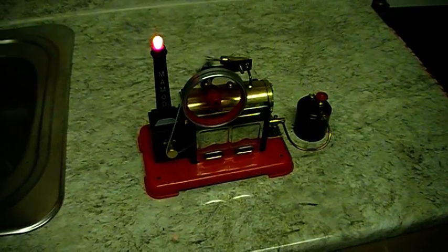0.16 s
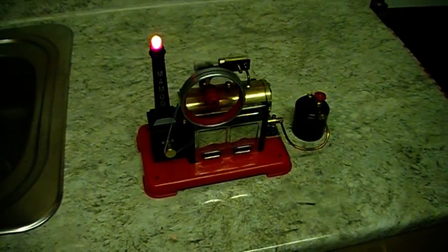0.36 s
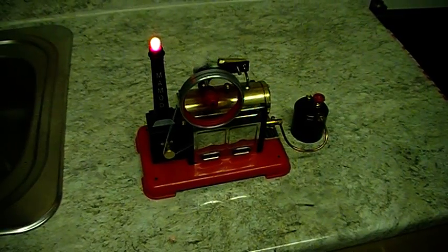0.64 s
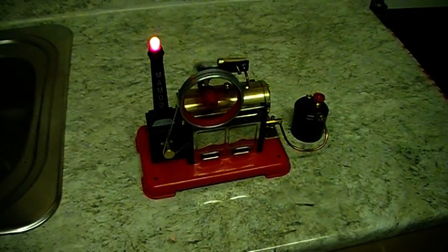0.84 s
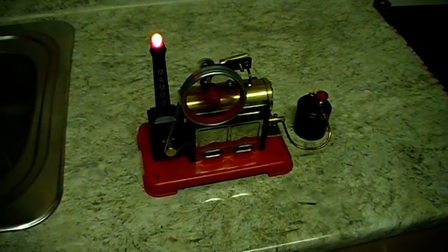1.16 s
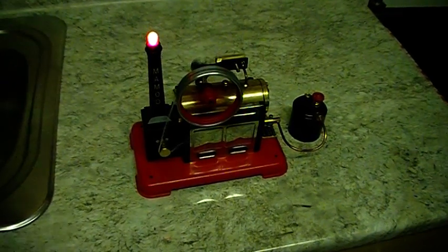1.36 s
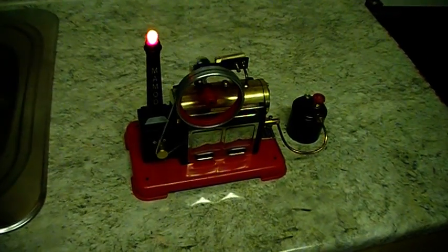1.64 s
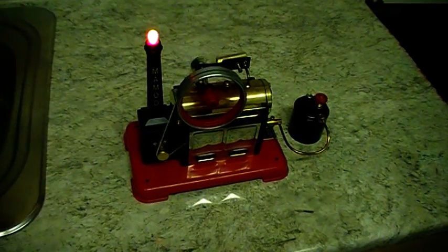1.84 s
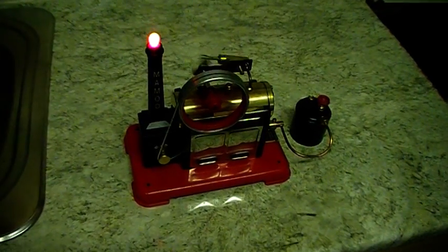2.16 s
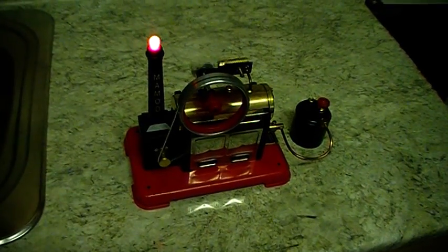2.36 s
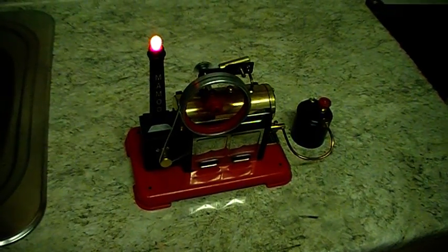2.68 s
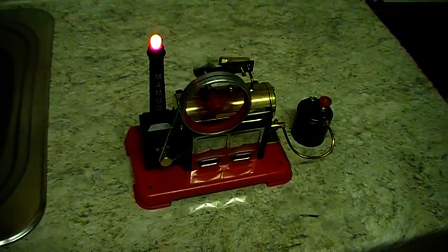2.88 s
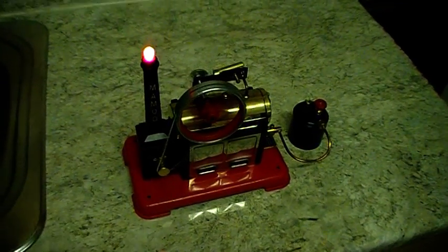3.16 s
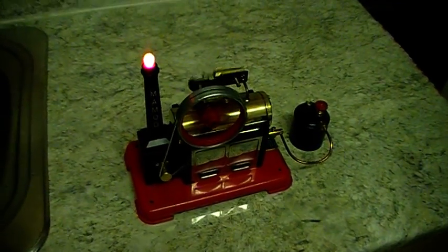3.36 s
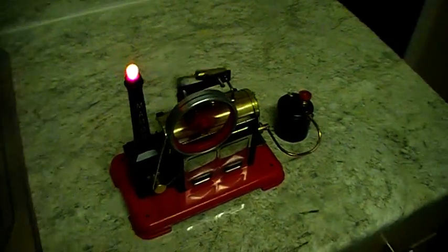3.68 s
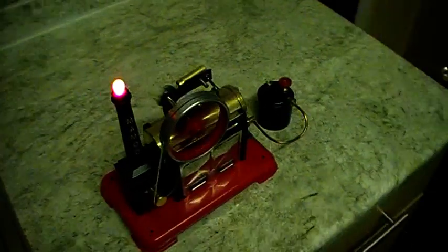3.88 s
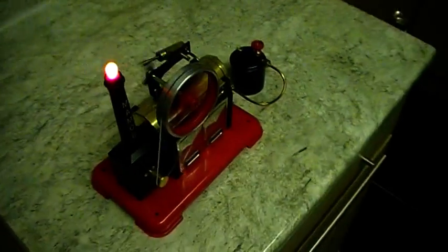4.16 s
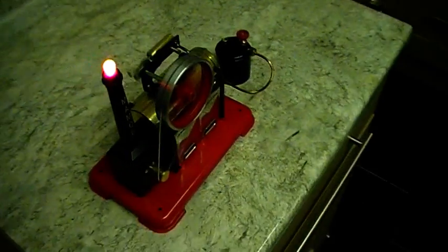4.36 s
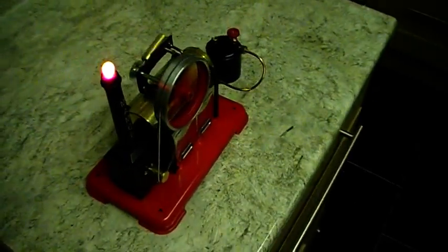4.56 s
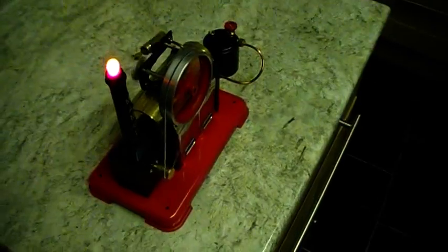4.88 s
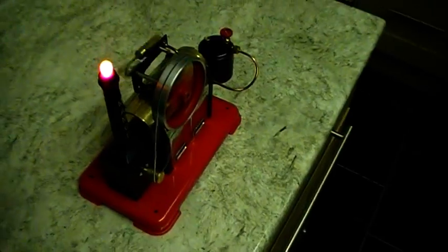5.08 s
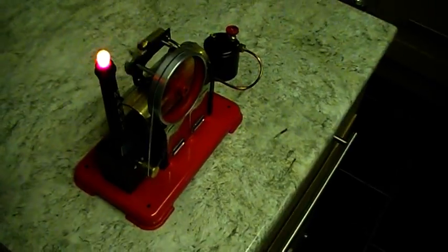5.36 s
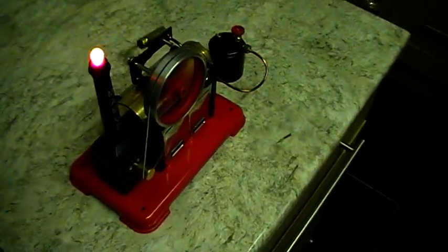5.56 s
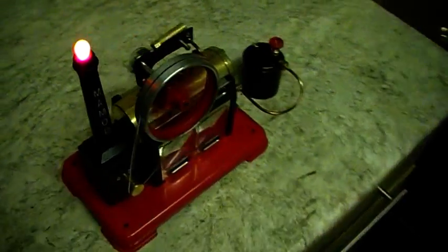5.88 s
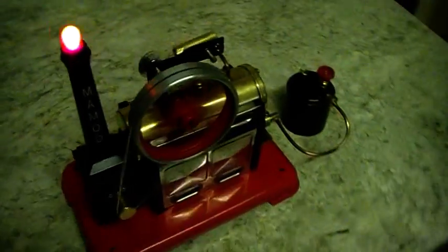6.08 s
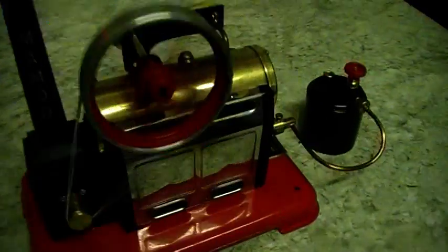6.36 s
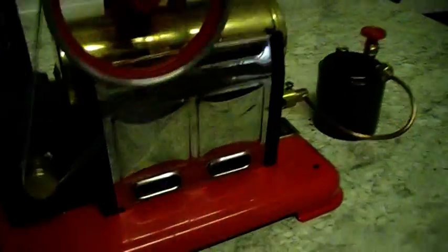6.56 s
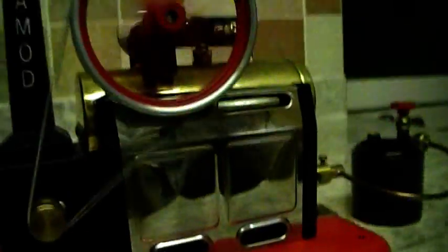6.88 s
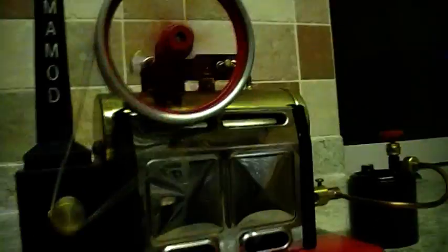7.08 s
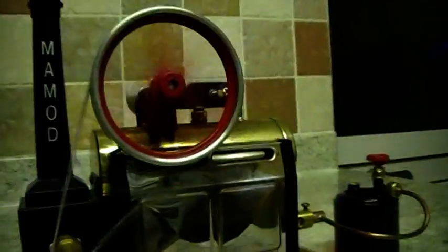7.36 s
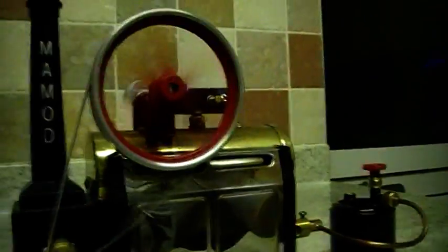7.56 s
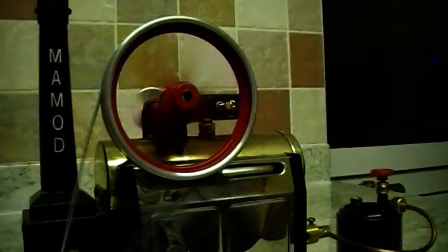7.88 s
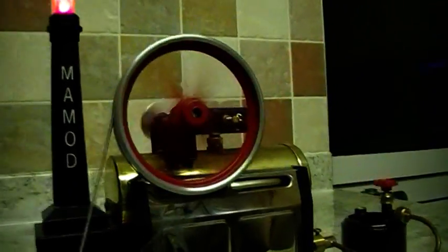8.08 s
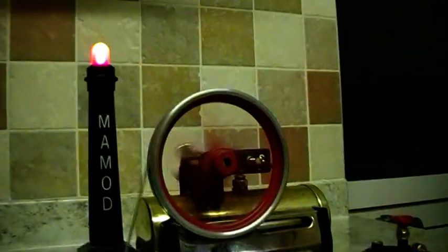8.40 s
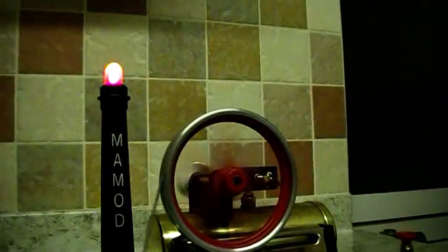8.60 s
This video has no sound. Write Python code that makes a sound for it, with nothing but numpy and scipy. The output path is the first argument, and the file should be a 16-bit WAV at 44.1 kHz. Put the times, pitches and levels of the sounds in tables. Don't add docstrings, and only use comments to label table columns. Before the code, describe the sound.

From 0 s a toy steam engine is already running at full, constant speed: around sixteen crank turns a second, each a cluster of uneven clicks and clacks, merging into a dense, fluttering tinny rattle. Below it are a dull base-plate thud and slight worktop rumble; above it, steady steam hiss pulsing with the strokes. A small dynamo buzzes at about 85 slaps a second, raspy and bright. Occasional harder belt clacks stand out, as near 1.1 s. Around 3-3.5 s the dynamo's bright rattle is nearer; from 4.2 to about 5.5 s, at the side, it recedes and the tone changes. At 6-6.8 s the microphone swings in, with quick shifts in level, a hollow worktop reflection and hard clacks near 6.5 s. From 6.8 s it is close, with stronger bearing rasp and less steam, until an abrupt end at 8.7 s. Small, hard tiled kitchen, short echo.

```python
import sys
import numpy as np
from scipy import signal
from scipy.fft import rfft, irfft, next_fast_len
from scipy.io import wavfile
from scipy.ndimage import uniform_filter1d

SR = 44100
rng = np.random.default_rng(int(sys.argv[2]) if len(sys.argv) > 2 else 0)


def boost_factor(decibels):
    exponent = np.asarray(decibels, float) / 20
    return 10 ** exponent


def store_wav(level_fs):
    pcm = np.round(np.clip(np.atleast_2d(level_fs), -1, 1) * 32767)
    wavfile.write(sys.argv[1], SR, pcm.T.astype(np.int16))


N = 384993
TIME_S = np.arange(N) / SR
CRANK_HZ, DYNAMO_HZ = 16.5, 85.0
SLACK_DB, SLACK_PER_S = 1.8, 8
FRAME_LEAD_MS = 1.6

# (time [s], crank [turns], dynamo [turns])
SHAFT_DRIFT = [(0, 0, -.13), (1, .0, -.13), (1.7, .015, -.205), (2.5, .03, -.19), (4, .075, -.125),
               (5, .09, -.12), (6, .125, -.135), (7, .15, -.15), (8, .175, -.08), (8.73, .19, -.06)]
# (time [s], view [0 front, 1 side, 2 swinging in, 3 close])
CAMERA_VIEW = [
    (0, 0),
    (3.7, .1),
    (4.2, 1),
    (6.1, 1),
    (6.3, 2),
    (6.55, 2),
    (6.8, 3),
    (8.73, 3),
]
# (time [s], engine nearness [dB], dynamo nearness [dB])
NEARNESS = [(0, 0, 1.5), (1.0, -0.5, 0), (2.2, 0, 2.5), (3.4, 0, 4.5), (4.2, -1, -2.5), (5.3, -1, -8),
            (5.9, -0.5, -1.5), (6.3, -1.1, 4), (6.44, -3, -2), (6.55, -1.5, -4), (6.74, -0.3, 4),
            (6.92, -1, -4.5), (7.2, 0.1, -4), (7.4, 0.85, -0.5), (8.2, -2, 2), (8.73, 0, 4)]
# (time [s], left minus right [dB])
PAN = [
    (0, -0.8),
    (3, -0.6),
    (5, 0.1),
    (7, .5),
    (8.73, -0.1),
]
# (time [s], lag [ms], level [dB])
WORKTOP_BOUNCE = [
    (0, .75, -34),
    (5.8, .75, -26),
    (6.0, .83, -16),
    (6.3, 1.1, -14),
    (6.6, 1.25, -15),
    (6.9, 1.4, -26),
    (8.73, 1.4, -34),
]

# (place [turns], length [ms], link click [dB], cover clack [dB], base thud [dB],
# push +1 or pull -1, steam puff [dB])
STROKES = [
    (0.873, 7.4, 9, 8.5, -4, 1, -2.5),
    (0.951, 9.3, -17.5, 10.5, 4.5, 1, -8),
    (0.174, 7.3, 0, 1, -9.5, -1, -1.5),
    (0.344, 2.5, -14, 5, -12, 1, 1),
    (0.451, 7.7, -1, 3, -3.5, -1, -4),
    (0.618, 7.8, -20, 6.5, 0, 1, -25),
]
# (place [crank turns], width [turns], level [dB])
BELT_TUGS = [
    (.46, .06, 0.1),
    (.01, .05, -1.5),
]
# (time [s], level over a tug [dB])
HARD_SLAPS = [(.0235, 4), (.387, 0), (1.0888, 8), (1.694, 1), (1.942, 5), (2.365, 5), (2.9043, 2),
              (3.353, 6), (6.508, 9.5), (6.577, -19), (6.754, 6), (6.871, 6), (7.1771, -5), (7.718, 7),
              (8.095, 7), (8.6517, 2)]
# (multiple of dynamo turn, level [dB rms])
SHAFT_HUM = [
    (1, -63),
    (2, -60),
    (4, -59),
]

# (frequency [Hz], width [Hz], front [dB], side [dB], swinging in [dB], close [dB])
CASING_MODES = [(799, 148, -9, -6, -9.5, -11), (841.4, 72.4, -1.5, 0.5, 0.5, -1.5),
                (888, 117, -5, -3.5, -6.5, -5.5), (1100, 18, 3, 2, -2, 2), (1150, 26, 1, -9, -3, 2),
                (1240, 50, -8, -6, 1, 1), (1350, 60, -5, -5, -6, -8), (1445, 50, 0, 2, -9, -6),
                (1500, 50, 0, 2, -7, -5), (1747, 75, -4.5, -13, -23, -5), (3086, 103, -13, -16, -24, -20),
                (3763, 306, -15, -16.5, -20, -22)]
COVER_MODES = [(1593, 120, -10.5, 10, 4, 0), (2060, 360, 4.5, 7, 2, -0.5), (2604, 404, 2, 3, -1.5, 3),
               (3580, 390, -18, -39, -14, -0.5)]
LINK_MODES = [(4530, 490, -5.5, -5.5, -8.5, -3.5), (5050, 360, 0, 2, -2, 1), (5290, 330, 1, 2.5, 1, 0.5),
              (6900, 1860, -5, -6.5, -5, -5), (9200, 930, -5, -9.5, -3, -6)]
BASE_MODES = [(250, 40, -27, -27, -27, -29), (313, 14, -5, -11, -14, -14), (420, 70, -9, -10, -14, -12),
              (479, 22, 0, -2, -6, -5), (512, 18, -2, 3, -5, -2), (540, 30, -5, -4, -9, -8),
              (580, 24, -4, -4, -8, -6), (612, 16, 0, 6, 1, 0), (685, 36, -9, -6, -9, -5)]
WORKTOP_MODES = [(116, 14, -7, -3, -6, -5), (134, 14, -2, 0, -2, -1), (150, 12, -4, -3, -5, -4),
                 (166, 12, -1, 0, -2, -1), (217, 20, -13, -13, -14, -14)]
FIREBOX_MODES = [(495, 130, 0, 1, -2, -.5), (620, 150, -1.5, -1, -2, -2)]
RING_MODES = [(882, 303, 0, -4.5, -5, -3.5), (1958, 203, 0.5, -5, -4, 2.5), (2140, 140, 6, 4, 2.5, 5.5),
              (2246, 314, 0, -1, -7, -3.5), (3220, 130, -20, -19, -17, -8.5)]
BELL_MODES = [(5695, 230, -6, -5.5, -4, -6), (6075, 255, 0, 1.5, 1.5, 2), (6410, 450, -15, -11.5, -8, -8)]
CAP_MODES = [(7630, 190, -8, -6.5, -19, -3), (8066, 120, -4, 5, 0, 2), (8340, 120, 0.5, -3, 4, -18),
             (8770, 170, -14.5, -4.5, -3, 2), (9250, 83, -6, -23.5, -25, -12),
             (9660, 240, -7, -25, -1.5, 1), (9850, 125, -6, -3, -27, -13), (10350, 92, -10, 0.5, -5, -3.5),
             (11700, 170, -23, -13, -14, -10), (12100, 74, -14, -5, -14, -13),
             (13200, 240, -24, -18, -16, -18)]
FRAME_MODES = [(2083, 214, 6.5, -7, 1.5, 1), (1430, 380, -5.5, 6, -8, -10),
               (6100, 1800, -21, -22, -20.5, -16.5)]

# (frequency [Hz], level [dB per Hz])
STEAM_SPECTRUM = [(150, -55), (250, -16), (491, -3.5), (658, -19.5), (883, 3.5), (1460, 1), (2170, -5.5),
                  (2810, -13.5), (4190, -14.5), (6020, -8.5), (9770, -9.5), (15600, -27)]
# (frequency [Hz], level [dB])
WALL_SPECTRUM = [(60, -16), (500, -19.5), (1200, -12), (2000, -13.5), (3700, -8.5), (5800, -14.5),
                 (7300, -15), (9500, -3), (11500, -5), (15000, -10)]

# (front [dB], side [dB], swinging in [dB], close [dB])
CASING_DB = (-25, -23, -21.5, -24.5)
RING_DB = (-30, -29.5, -23, -24.5)
BELL_DB = (-28.5, -27.5, -30, -30)
STEAM_DB = (-29, -29, -29.5, -33)
TUG_DB = (-30.5, -32.5, -27, -24)


def engine(turns, view, casing_db, steam_db):
    click = clack = thud = puff = 0
    for place, length_ms, click_db, clack_db, thud_db, way, puff_db in STROKES:
        train = blows(turns, place, jitter_ms=0.12, scatter_db=1.3)
        swell = burst(train, rise_ms=0.28, fall_ms=length_ms)
        click = click + boost_factor(click_db) * swell
        clack = clack + boost_factor(clack_db) * swell
        puff = puff + boost_factor(puff_db) * swell
        thud = thud + np.sign(way) * boost_factor(thud_db) * train
    slack = boost_factor(SLACK_DB / 2 * wander(SLACK_PER_S))
    casing = ring(slack * (clack + boost_factor(10)) * grit(2.3), CASING_MODES, view)
    cover = ring(slack * (clack + boost_factor(-24)) * grit(1.8), COVER_MODES, view)
    link = ring((click + boost_factor(-30)) * grit(1.4), LINK_MODES, view)
    knocks = (boost_factor(-13) * base_plate(thud, clack, view) + boost_factor(-29) * worktop(turns, view)
              + boost_factor(-13) * firebox(turns, view) + boost_factor(-6.5) * link + boost_factor(-4.5) * cover)
    slow_db = uniform_filter1d(casing_db, SR)
    return boost_factor(casing_db + 1.5) * casing + boost_factor(slow_db) * knocks + boost_factor(steam_db) * steam(puff)


def base_plate(thud, clack, view):
    load = level(early(thud, ms=9.5), 0)
    rumble = (clack + 0.4) * grit(1.2)
    return ring(load + boost_factor(-10) * rumble, BASE_MODES, view)


def worktop(turns, view):
    rock = level(blows(turns, 0.501, jitter_ms=0.3, scatter_db=1.5), 0)
    return ring(rock + boost_factor(-3) * grit(1.5), WORKTOP_MODES, view)


def firebox(turns, view):
    thump = blows(turns, 0.86, jitter_ms=0.3, scatter_db=2.2)
    return ring(ring(thump, FIREBOX_MODES, view), FIREBOX_MODES, view)


def steam(puff):
    leak = (1 + 0.49 * uniform_filter1d(puff, 200)) * rng.standard_normal(N)
    leak = level(colour(leak, STEAM_SPECTRUM), 0)
    jet_spectrum = [(4000, -26), (9000, -6.0), (12000, -9), (13500, -14), (15500, -29)]  # (Hz, dB)
    jet = level(colour(puff * rng.standard_normal(N), jet_spectrum), 0)
    return boost_factor(1.0) * leak + boost_factor(-6.0) * jet


def dynamo(turns, view, casing_db, ring_db, bell_db, cap_db):
    slap = burst(blows(turns, 0.88, jitter_ms=0.3, scatter_db=1.5), rise_ms=0.66, fall_ms=1.8)
    chatter = slap * grit(0.62)
    rub = grit(3.4)
    frame_chatter = early(chatter, FRAME_LEAD_MS)
    hum = sum(boost_factor(db) * np.sqrt(2) * np.sin(2 * np.pi * k * turns) for k, db in SHAFT_HUM)
    drone = ring(blows(turns, 0.9, jitter_ms=0.08, scatter_db=1.5), BASE_MODES, view)
    bearing = ring(frame_chatter + boost_factor(-9) * rub, RING_MODES, view)
    bell = ring(chatter + boost_factor(-45) * rub, BELL_MODES, view)
    cap = ring(chatter + boost_factor(-48) * rub, CAP_MODES, view)
    hiss = level(colour(chatter, STEAM_SPECTRUM), 0)
    casing = ring(frame_chatter, CASING_MODES, view)
    return (boost_factor(ring_db + 1.87) * bearing + boost_factor(bell_db) * bell + boost_factor(cap_db + 1.0) * cap
            + hum + boost_factor(-43) * drone + boost_factor(cap_db - 4.5) * hiss
            + boost_factor(casing_db - 12 + 3.94 * view) * casing)


def belt_clacks(crank, turns, view):
    tug = 0
    for place, width, db in BELT_TUGS:
        off_turns = (crank - place + 0.5) % 1 - 0.5
        tug = tug + boost_factor(db) * np.exp(-(off_turns / width) ** 2 / 2)
    slack = boost_factor(SLACK_DB * wander(SLACK_PER_S))
    train = tug * slack * blows(turns, 0.8, jitter_ms=0.3, scatter_db=1.8)
    s, db = np.transpose(HARD_SLAPS)
    train[(s * SR).astype(int)] = boost_factor(db)
    rattle = burst(train, rise_ms=1.2, fall_ms=2.4) * grit(0.7)
    return boost_factor(facing(view, TUG_DB)) * ring(rattle, FRAME_MODES, view)


def bounce(x):
    lag_ms, bounce_db = curve(WORKTOP_BOUNCE)
    return boost_factor(bounce_db) * np.interp(TIME_S - lag_ms / 1000, TIME_S, x)


def room(x, t60_s, db):
    t = np.arange(int(0.5 * SR)) / SR
    tail = rng.standard_normal(len(t)) * np.exp(-np.log(1000) * t / t60_s)
    return boost_factor(db) * signal.oaconvolve(x, tail / np.sqrt(np.sum(tail ** 2)))[:N]


def blows(turns, place, jitter_ms, scatter_db):
    at = np.flatnonzero(np.diff(np.floor(turns - place)) > 0)
    timing, force = rng.standard_normal((len(at), 2)).T
    late = (jitter_ms * timing * SR / 1000).astype(int)
    train = np.zeros(N)
    train[np.clip(at + late, 0, N - 1)] = boost_factor(scatter_db * force)
    return train


def burst(train, rise_ms, fall_ms):
    t_ms = np.arange(int(0.04 * SR)) * 1000 / SR
    shape = np.exp(-t_ms / fall_ms) * (1 - np.exp(-t_ms / rise_ms))
    return np.maximum(signal.oaconvolve(train, shape / shape.max())[:N], 0)


def grit(spread_db):
    strength = np.minimum(rng.exponential(size=N), 6)
    return level(rng.standard_normal(N) * boost_factor(spread_db * strength), 0)


def ring(x, modes, view):
    out = 0
    for k, (hz, width_hz, *db) in enumerate(modes):
        b, a = signal.iirpeak(hz, hz / width_hz, SR)
        strength = np.interp(view, (0, 1, 2, 3), boost_factor(np.array(db)))
        out = out + (-1) ** k * strength * signal.lfilter(b, a, x)
    return level(out, 0)


def colour(x, table):
    hz, db = np.transpose(table)
    size = next_fast_len(x.shape[-1])
    log_f = np.log(np.arange(size // 2 + 1) * SR / size + 1)
    gain = boost_factor(np.interp(log_f, np.log(hz + 1), db))
    return irfft(rfft(x, size) * gain, size)[..., :x.shape[-1]]


def wander(per_s):
    hold = SR // per_s
    steps = np.repeat(rng.standard_normal(N // hold + 1), hold)
    return level(uniform_filter1d(steps, hold)[:N], 0)


def early(x, ms):
    return np.roll(x, -int(ms * SR / 1000))


def facing(view, db):
    return np.interp(view, np.arange(len(db)), db)


def curve(table):
    s, *columns = np.transpose(table)
    return [np.interp(TIME_S, s, c) for c in columns]


def level(x, db):
    return x * boost_factor(db) / np.sqrt(np.mean(x ** 2))


def scene():
    crank_drift, dynamo_drift = curve(SHAFT_DRIFT)
    crank = CRANK_HZ * TIME_S + crank_drift
    shaft = DYNAMO_HZ * TIME_S + dynamo_drift
    (view,), (pan_db,) = curve(CAMERA_VIEW), curve(PAN)
    engine_db, dynamo_db = curve(NEARNESS)
    casing_db = facing(view, CASING_DB) + engine_db
    steam_db = facing(view, STEAM_DB) + engine_db
    ring_db = facing(view, RING_DB) + engine_db
    treble_db = -0.6 * np.cos(3 * 2 * np.pi * (crank - 0.16))
    bell_db = facing(view, BELL_DB) + dynamo_db + treble_db

    near = engine(crank, view, casing_db, steam_db)
    near = near + dynamo(shaft, view, casing_db, ring_db, bell_db, cap_db=steam_db + treble_db)
    near = near + boost_factor(engine_db) * belt_clacks(crank, shaft, view)
    near = near + bounce(near)

    mid = near + room(near, t60_s=0.35, db=-14)
    side = colour(room(near, t60_s=0.17, db=-0.4), WALL_SPECTRUM)
    side = side - 0.08 * signal.lfilter(*signal.butter(1, 600, fs=SR), mid)
    return mid * boost_factor(np.array([pan_db, -pan_db]) / 2) + side * np.array([[1], [-1]])


def band_limit(x):
    return signal.sosfilt(signal.butter(12, 15730, fs=SR, output="sos"), x)


def record(dry):
    x = np.tanh(0.98 * dry) / 1.203
    x = signal.sosfilt(signal.butter(3, 66, "high", fs=SR, output="sos"), x)
    x = signal.sosfilt(signal.ellip(12, 0.2, 70, 15760, fs=SR, output="sos"), x)
    return band_limit(x)


dry = scene()
out = record(dry)
store_wav(out)
```